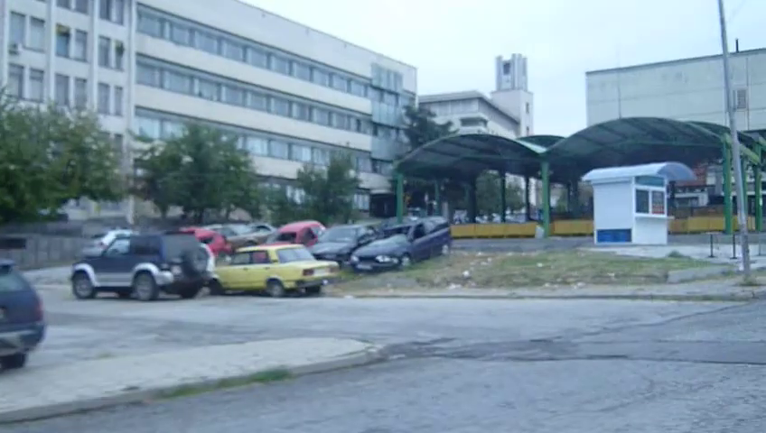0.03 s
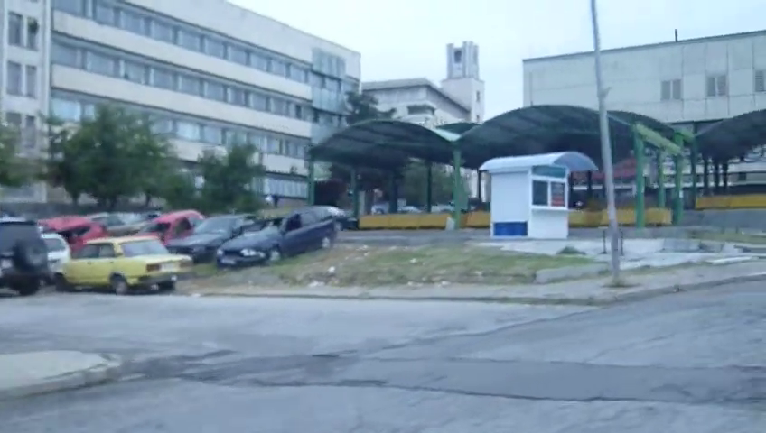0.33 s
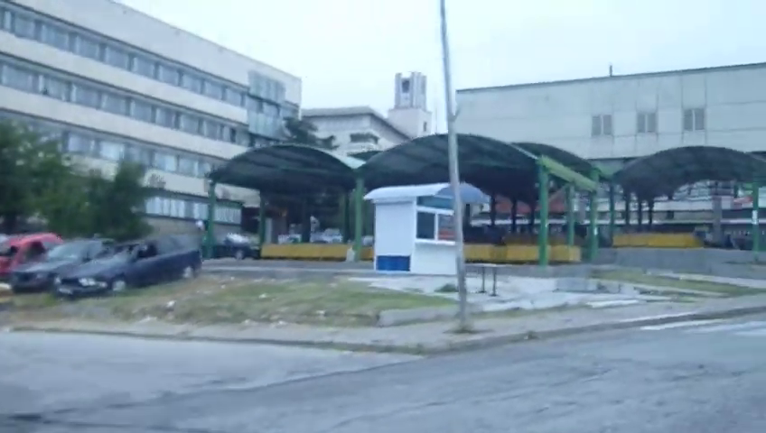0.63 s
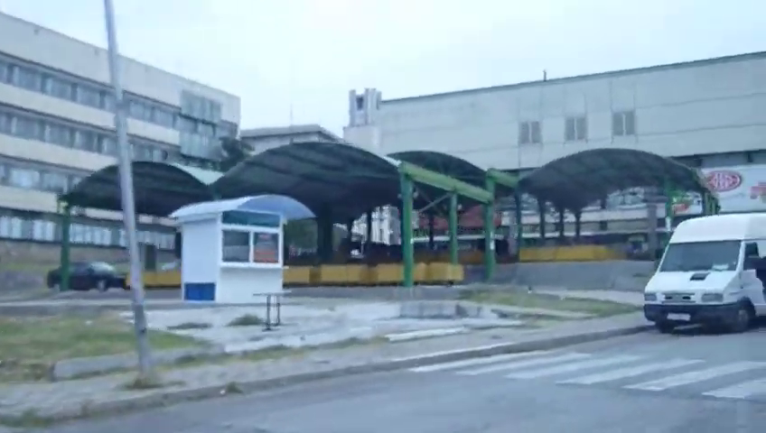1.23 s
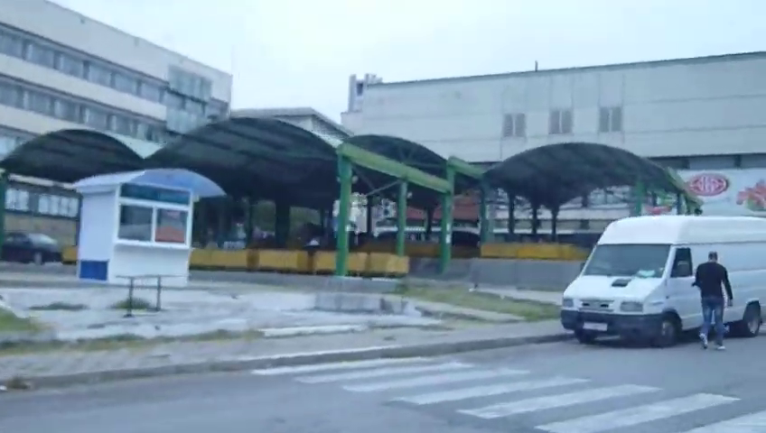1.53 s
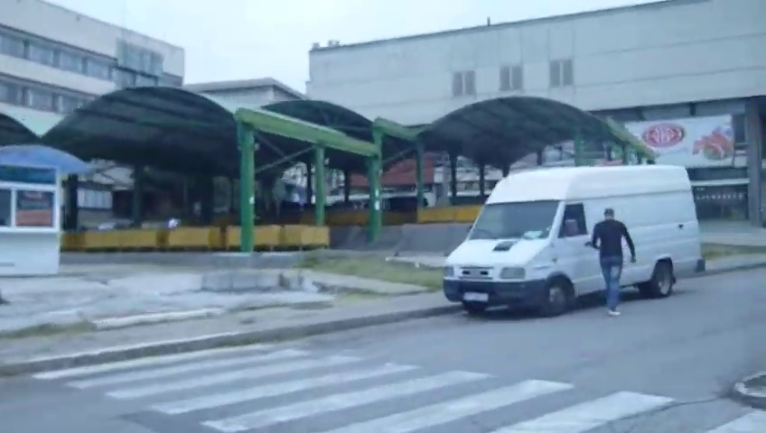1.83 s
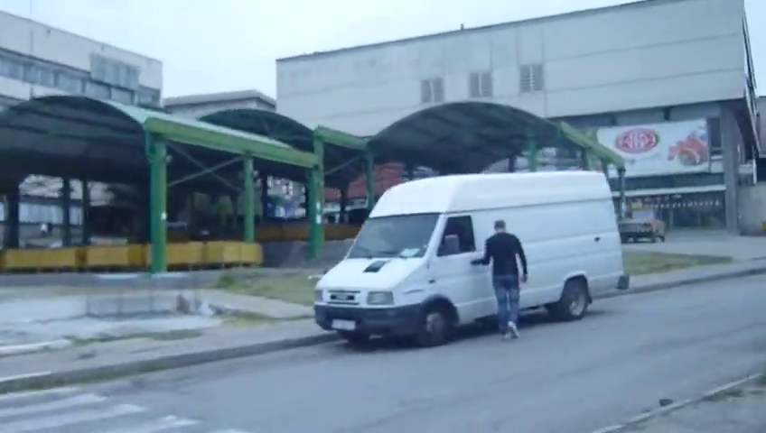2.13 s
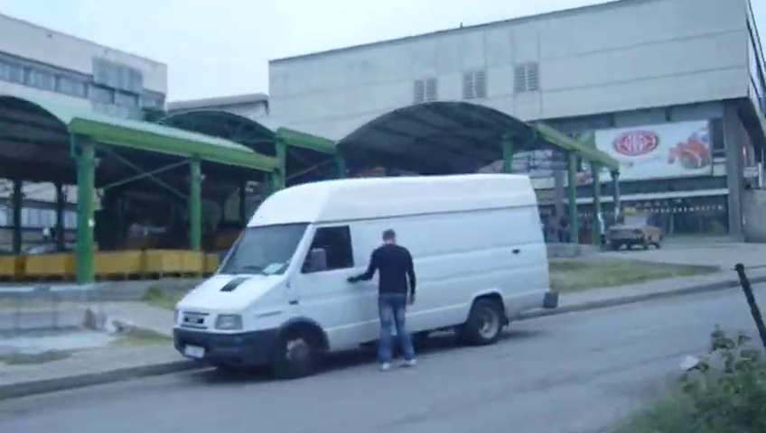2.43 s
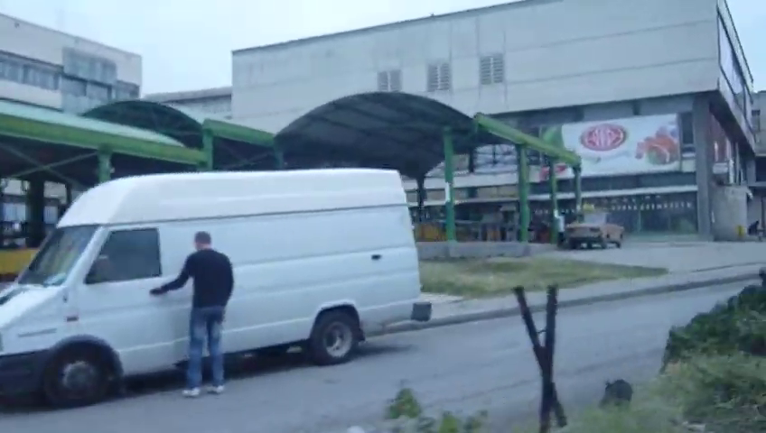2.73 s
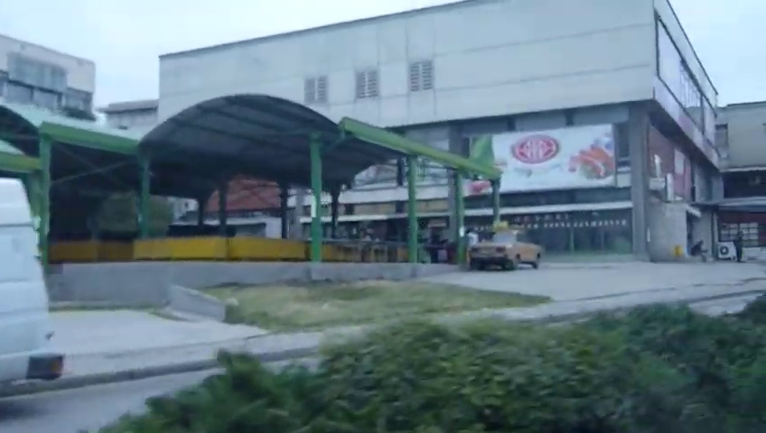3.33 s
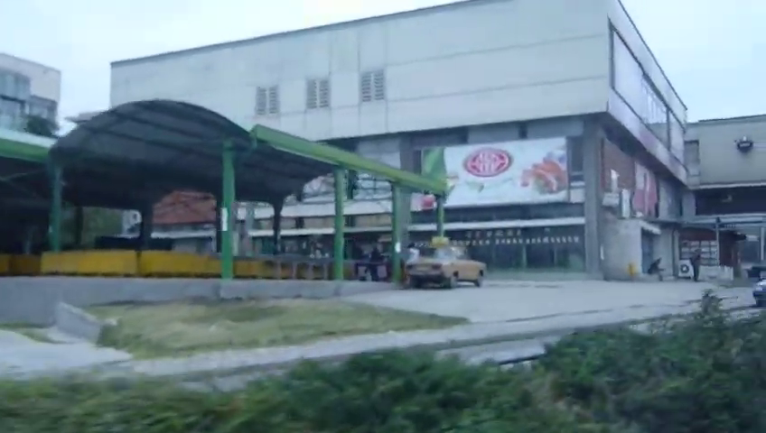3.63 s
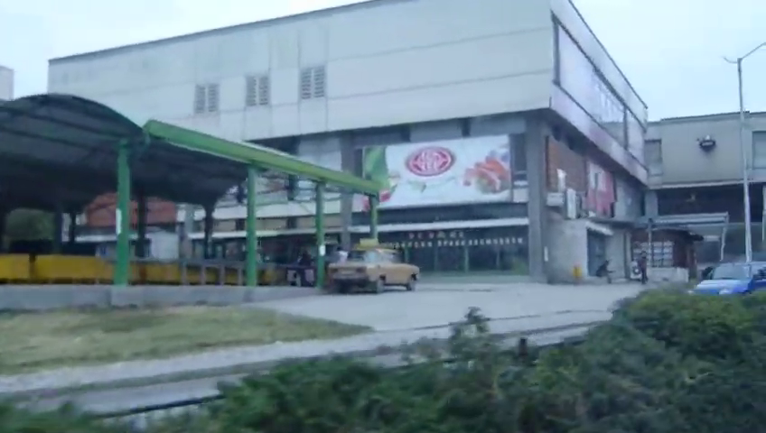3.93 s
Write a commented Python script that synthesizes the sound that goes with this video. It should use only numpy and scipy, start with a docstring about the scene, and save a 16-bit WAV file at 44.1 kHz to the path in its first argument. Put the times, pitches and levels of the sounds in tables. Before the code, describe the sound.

Low road and engine rumble inside a moving minibus, with loose parts clacking and knocking.

```python
"""Minibus on a patched city street

From inside, the tyres and a low-revving engine make the cabin rumble and its panels drum.
Bumps thump through the floor, a loose door or window clacks and the bodywork knocks.
A trim panel buzzes in step with the engine; small fittings rustle, tick and squeak.
The small cabin smears the clacks and ticks. A faint whine and hiss lie under it all."""
import sys
import numpy as np
from scipy import signal
from scipy.fft import rfft, irfft, next_fast_len
from scipy.io import wavfile
from scipy.ndimage import map_coordinates

SR = 44100
rng = np.random.default_rng(int(sys.argv[2]) if len(sys.argv) > 2 else 0)


def store_wav(level_fs):
    """Save 16-bit WAV to argv[1]."""
    pcm = np.round(np.clip(np.atleast_2d(level_fs), -1, 1) * 32767)
    wavfile.write(sys.argv[1], SR, pcm.T.astype(np.int16))


N = 176400  # 4 seconds


def amp(db):
    """Turn decibels into a number to multiply a sound by."""
    return 10 ** (np.asarray(db) / 20)


def unit(x):
    """Scale a sound to an average strength (rms) of 1."""
    return x / np.sqrt(np.mean(x ** 2) + 1e-20)


def curve(rows):
    """Join (time_s, value) points with straight lines, one value per sample."""
    return np.interp(np.arange(N) / SR, *np.transpose(rows))


def wobble(rate_hz):
    """A smooth curve through rate_hz random values a second."""
    steps = np.linspace(0, N, N // 32)
    knots = rng.standard_normal(int(N * rate_hz / SR) + 4)
    return np.interp(np.arange(N), steps, map_coordinates(knots, [steps * rate_hz / SR]))


def filtered(x, response):
    """Turn each pitch in x up or down by the factor response(hz)."""
    size = next_fast_len(len(x) + 8192)
    return irfft(rfft(x, size) * response(np.fft.rfftfreq(size, 1 / SR)), size)[:len(x)]


def noise(colour, size=N, tilt_db_per_octave=0):
    """Noise of strength 1; its colour says how strong low and high pitches are next to each other."""
    pitch_hz, level_db = np.transpose(colour)
    level_db = level_db + tilt_db_per_octave * np.log2(pitch_hz)
    response = lambda hz: amp(np.interp(np.log(hz + 1), np.log(pitch_hz), level_db))
    return unit(filtered(rng.standard_normal(size), response))


def add(track, start_s, sound):
    """Mix a sound into the track at start_s."""
    part = track[max(0, round(start_s * SR)):][:len(sound)]
    part += sound[:len(part)]


def strike(t, fade_s, attack_s=0.0012):
    """The loudness of a hit: a fast rise, then a fall of 60 dB every fade_s."""
    return (1 - np.exp(-t / attack_s)) * amp(-60 * t / fade_s)


def cabin(x):
    """A sound plus its short, quieter echo in the cabin."""
    t = np.arange(SR // 4) / SR
    tail = rng.standard_normal(len(t)) * strike(t, fade_s=0.19, attack_s=0.0022)
    echo = signal.fftconvolve(x, tail / np.linalg.norm(tail))[:len(x)]
    return x + amp(-7) * echo


# How hard the rough road shakes the wheels: time_s, level_db
ROAD_ROUGHNESS = [(0, -20), (.08, -26), (.2, -20.5), (.31, -19.5), (.48, -24.5), (.68, -22), (.9, -28),
                  (1.02, -19.5), (1.09, -22.5), (1.2, -21), (1.31, -28), (1.45, -19), (1.66, -19.5),
                  (1.78, -26), (2.15, -30), (2.37, -28.5), (2.49, -22), (2.62, -25.5), (2.8, -20.5),
                  (3.03, -26.5), (3.3, -23.5), (3.58, -29), (3.92, -22.5), (4, -24)]
# Tone of the rumble: pitch_hz, level_db
RUMBLE_COLOUR = [(15, -34), (42, -28.5), (60, -15.5), (86, 1.5), (110, -0.5), (165, -2), (250, -9),
                 (400, -22.5), (900, -44), (3000, -120)]
# Tone of the deeper shudder: pitch_hz, level_db
SHUDDER_COLOUR = [(15, -11), (38, -9.5), (54, -4.5), (70, 6), (110, -25.5), (400, -120)]

def tyres():
    """Tyres shake the cabin: a deep rumble, and a shudder that grows faster on rough patches."""
    road_db = curve(ROAD_ROUGHNESS)
    rumble = amp(road_db) * noise(RUMBLE_COLOUR)
    shudder_db = -38 + 1.5 * (road_db - road_db.mean())
    return rumble + amp(shudder_db) * noise(SHUDDER_COLOUR)


# How strongly the body panels drum: time_s, level_db
PANEL_DRUMMING = [(0, -32.5), (.12, -34), (.22, -32), (.48, -32), (.72, -32.5), (1.1, -31), (1.33, -31.5),
                  (1.54, -29.5), (1.68, -32.5), (1.83, -30.5), (1.93, -36), (2.06, -32), (2.16, -35),
                  (2.33, -29), (2.44, -29.5), (2.6, -33), (2.95, -28.5), (3.1, -32.5), (3.45, -35),
                  (3.65, -32.5), (4, -32.5)]
# Tone of the drumming: pitch_hz, level_db
PANEL_COLOUR = [(100, -12), (250, 3.5), (370, 1), (500, -5.5), (720, -10), (950, -15), (1200, -23.5),
                (1550, -25.5), (2200, -35.5), (4000, -42), (8500, -63)]
# Notes the panels naturally ring at: pitch_hz, level_db
PANEL_NOTES = [(232, -4.5), (262, -8), (303, -5.5), (378, -7.5), (432, -10.5), (530, -17)]

def body_panels():
    """Shaken panels drum and drone on their own wavering notes."""
    drumming = amp(1.1 * wobble(25.07)) * noise(PANEL_COLOUR)
    drone, t = np.zeros(N), np.arange(N) / SR
    for pitch_hz, level_db in PANEL_NOTES:
        waver = wobble(30) + 1j * wobble(30)  # blurs both loudness and pitch
        drone += amp(level_db) * np.real(waver * np.exp(2j * np.pi * pitch_hz * t))
    return amp(curve(PANEL_DRUMMING)) * (drumming + drone)


# Engine speed, in firings a second: time_s, rate_hz
FIRING_RATE = [(0, 43.5), (1.2, 43.1), (2.0, 43.5), (2.6, 43.5), (3.3, 42), (4, 40.2)]
# Tones in the engine's hum: multiple_of_firing_rate, level_db
ENGINE_TONES = [(2, -38.5), (3, -48), (4, -38.5), (6, -41)]

def engine():
    """The firing engine hums in low, unsteady tones at multiples of its firing rate."""
    rate_hz = curve(FIRING_RATE) * (1 + 0.009 * wobble(11))
    phase = 2 * np.pi * np.cumsum(rate_hz) / SR
    out = np.zeros(N)
    for multiple, level_db in ENGINE_TONES:
        loudness = np.sqrt(2) * amp(level_db + 3.7 * wobble(4.9))
        out += loudness * np.sin(multiple * phase + 2 * np.pi * rng.random())
    return out


# How much the small fittings jiggle: time_s, level_db
JIGGLE_LEVEL = [(0, -46), (.1, -53), (.31, -52), (.4, -45.5), (.65, -49.5), (.97, -51), (1.1, -46),
                (1.33, -48.5), (1.45, -44.5), (1.76, -44), (1.95, -50), (2.045, -45.5), (2.13, -52),
                (2.73, -51), (2.84, -40), (2.97, -51.5), (3.1, -51.5), (3.4, -54), (4, -54.5)]
# Tone of the jiggling: pitch_hz, level_db
JIGGLE_COLOUR = [(400, -15.5), (1000, 11), (1800, 6), (2500, 1), (3100, 0.5), (4000, -5.5), (5500, -7),
                 (7000, -9), (8300, -26.5)]

def jiggle():
    """Countless tiny touches between fittings merge into a grainy rustle."""
    grain = unit(amp(2.0 * wobble(160) + 1.5 * wobble(22)))
    return amp(curve(JIGGLE_LEVEL) - 0.5) * grain * noise(JIGGLE_COLOUR)


def whine_and_hiss():
    """A faint, wavering high whine over an even hiss."""
    pitch_hz = 6667 + 8 * wobble(120)
    whine = np.sqrt(2) * np.sin(2 * np.pi * np.cumsum(pitch_hz) / SR)
    return amp(-77.5) * whine + amp(-68) * rng.standard_normal(N)


# Clacks of the loose door or window: start_s, level_db, tilt_db_per_octave, ring_db
CLACKS = [(.018, -37.5, 1.5, -17), (.331, -35, 2, -4), (.352, -35.5, 1.5, -5), (.408, -30, 1, -9),
          (.476, -31, -1.5, -2.5), (.543, -40.5, 1.5, -8), (0.754, -37.5, -0.5, -12),
          (1.007, -33.5, -1, -9), (1.434, -30.5, 1, -10), (1.457, -26, -0.5, -6), (1.522, -32, 2, -7),
          (1.566, -29, -1, -12), (1.644, -30, -6, -14), (1.777, -31, 0.5, -6), (2.038, -34.5, -1, -9),
          (2.83, -23.5, -2.5, -6.5), (2.899, -29.5, 2.5, -4.5), (2.961, -31, 2, -4), (3.112, -40, 3, -8),
          (3.265, -35, 0, -5)]
# Tone of the sharp first snap: pitch_hz, level_db
SNAP_COLOUR = [(300, -19), (1500, 7), (3200, 2), (5500, -2), (7000, -3.5), (8000, -4.5)]
# Tone of the longer crack: pitch_hz, level_db
CRACK_COLOUR = [(200, -13.5), (500, 13.5), (900, 9.5), (1200, -1.5), (1550, 5.5), (1950, 0.5), (2500, -4.5),
                (3200, -8), (4000, -10), (6000, -11), (7000, -18), (8300, -30)]
# Notes the loose part rings at: pitch_hz, level_db, fade_s
CLACK_NOTES = [(1527, -5.5, 0.038), (1940, -6, 0.045), (2929, -3.5, 0.043), (3223, -7.5, 0.045),
               (4610, -15, 0.071), (5140, -16, 0.036), (5940, -14.5, 0.015)]

def clacks():
    """The loose part snaps against its frame and bounces once; no two hits ring quite alike."""
    bounce_s, bounce_db = 0.006, -2.5
    out, t = np.zeros(N), np.arange(SR // 7) / SR
    for start_s, level_db, tilt, ring_db in CLACKS:
        snap = strike(t, fade_s=0.013) * noise(SNAP_COLOUR, len(t))
        add(out, start_s, amp(level_db - 5.5) * snap)
        for delay_s, loss_db in [(0, 0), (bounce_s * rng.uniform(0.76, 1.3), bounce_db)]:
            crack = strike(t, fade_s=0.067, attack_s=0.00057) * noise(CRACK_COLOUR, len(t), tilt)
            ring = np.zeros(len(t))
            for pitch_hz, note_db, fade_s in CLACK_NOTES:
                loudness = amp(note_db + rng.normal(0, 2)) * strike(t, fade_s)
                detuned_hz = pitch_hz * rng.normal(1, 0.007)
                ring += loudness * np.sin(2 * np.pi * (detuned_hz * t + rng.random()))
            add(out, start_s + delay_s, amp(level_db + loss_db) * cabin(crack + amp(ring_db) * ring))
    return out


# Ticks of the fittings: start_s, level_db
TICKS = [(0.128, -51.5), (.262, -51), (.659, -49), (0.885, -57), (1.326, -43.5), (1.378, -59), (1.394, -43),
         (1.541, -51), (1.594, -50.5), (1.815, -48), (1.906, -50), (2.012, -43), (2.028, -49), (2.09, -48),
         (2.268, -48.5), (2.318, -45), (2.684, -50), (2.712, -53), (2.94, -45), (2.975, -48), (3.021, -45),
         (3.074, -49), (3.217, -46), (3.402, -59), (3.567, -49.5), (3.585, -48), (3.908, -45.5),
         (3.922, -50.5)]
# Tone of a tick: pitch_hz, level_db
TICK_COLOUR = [(800, -15), (2000, 6.5), (3100, 2.5), (4000, -2.5), (5500, 2), (8300, -23.5)]

def ticks():
    """Small fittings touch lightly, each time with a short, bright tick."""
    out, t = np.zeros(N), np.arange(SR // 8) / SR
    for start_s, level_db in TICKS:
        add(out, start_s, amp(level_db) * strike(t, fade_s=0.067) * noise(TICK_COLOUR, len(t)))
    return out


# Wheels hitting bumps: start_s, shove_db, boom_db
BUMPS = [(0.199, -20, -31), (0.384, -18, -27), (1.034, -21, -22.5), (1.145, -32, -20), (1.439, -22, -7.5),
         (1.6, -17, -26), (2.733, -18, -9)]

def bumps():
    """Each bump gives the floor one quickly fading shove and makes the cabin boom."""
    shove_hz, boom_hz = 51, 162.5
    out, t = np.zeros(N), np.arange(SR // 4) / SR
    shove = -strike(t, fade_s=0.084, attack_s=0.0022) * np.sin(2 * np.pi * shove_hz * t)
    boom = -strike(t, fade_s=0.15, attack_s=0.0033) * np.sin(2 * np.pi * boom_hz * t)
    for start_s, shove_db, boom_db in BUMPS:
        add(out, start_s, amp(shove_db) * shove + amp(boom_db) * boom)
    return out


# Knocks of the bodywork: start_s, level_db
KNOCKS = [(.49, -35), (1.005, -29.5), (1.15, -35.5), (1.245, -30.5), (1.405, -25.5), (1.437, -26.5),
          (1.465, -30.5), (1.49, -27.5), (1.52, -30), (1.551, -25), (1.787, -25), (2.03, -27),
          (2.258, -31.5), (2.318, -38), (2.385, -42), (2.86, -28), (2.9, -30), (2.98, -27)]
# Tone of a knock: pitch_hz, level_db
KNOCK_COLOUR = [(40, -52), (150, -20.5), (330, 3.5), (540, 6.5), (740, -0.5), (930, -1.5), (1200, -19.5),
                (2000, -12), (4000, -41), (9000, -78)]

def knocks():
    """The jolted bodywork gives dull, hollow knocks."""
    out, t = np.zeros(N), np.arange(SR // 4) / SR
    shape = strike(t, fade_s=0.2, attack_s=0.0039)
    for start_s, level_db in KNOCKS:
        add(out, start_s, amp(level_db) * shape * noise(KNOCK_COLOUR, len(t)))
    return out


# Spells of buzzing: start_s, length_s, level_db
BUZZES = [(1.0155, .29, -41.5), (1.668, .085, -36), (2.747, .26, -41)]
# Tone of the rasp in each tap: pitch_hz, level_db
RASP_COLOUR = [(100, -15.5), (500, 1), (1000, -0.5), (2000, 8), (3000, 0), (4200, 1.5), (6200, -2.5),
               (7200, -7.5), (8300, -21.5)]
# Notes the trim panel rings at: pitch_hz, level_db
TRIM_NOTES = [(1410, 8), (2440, 2), (2920, -3.5), (3400, 0.5), (4320, 0), (4680, -1), (5290, -3.5),
              (5460, -5), (5890, -2), (6650, -14)]

def trim_buzz():
    """In short spells, a trim panel taps as fast as the engine fires; each tap rasps and rings."""
    rasp_db, ring_db = 5, 2.5
    out, t = np.zeros(N), np.arange(SR // 8) / SR
    rate_hz = curve(FIRING_RATE)
    shape = strike(t, fade_s=0.044, attack_s=0.006)
    for start_s, length_s, level_db in BUZZES:
        gap_s = 1 / rate_hz[int(start_s * SR)]
        for tap_s in np.arange(start_s, start_s + length_s, gap_s):
            ring = sum(amp(db) * np.sin(2 * np.pi * (hz * t + rng.random())) for hz, db in TRIM_NOTES)
            tap = amp(rasp_db) * noise(RASP_COLOUR, len(t)) + amp(ring_db) * unit(ring)
            add(out, tap_s, amp(level_db + rng.normal(0, 1.0)) * shape * tap)
    return out


# Tiny squeaks: start_s, pitch_hz, level_db
SQUEAKS = [(1.509, 6500, -45.5), (1.531, 7500, -49)]

def squeaks(length_s=0.017):
    """Rubbing metal gives brief, thin chirps."""
    out, t = np.zeros(N), np.arange(int(length_s * SR)) / SR
    for start_s, pitch_hz, level_db in SQUEAKS:
        add(out, start_s, amp(level_db) * np.hanning(len(t)) * np.sin(2 * np.pi * pitch_hz * t))
    return out


def scene():
    """Rumble and rattles, mixed into one channel."""
    rattles = clacks() + knocks() + cabin(ticks()) + squeaks() + trim_buzz() + jiggle()
    rumble = tyres() + body_panels() + bumps() + engine()
    return (rumble + rattles + whine_and_hiss())[None]


def record(dry):
    """Cut the highest treble steeply and shift the whole wave slightly below zero."""
    top_hz, offset = 8450, -0.0466
    low_pass = lambda hz: 1 / np.sqrt(1 + (hz / top_hz) ** 120)
    return filtered(dry[0], low_pass)[None] + offset


dry = scene()
out = record(dry)
store_wav(out)
```